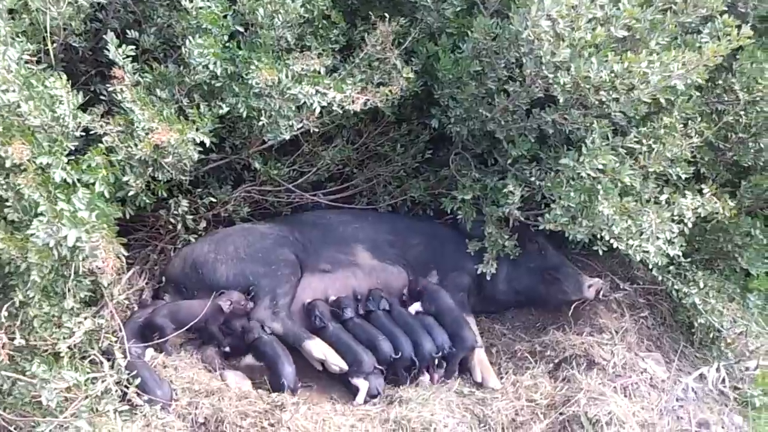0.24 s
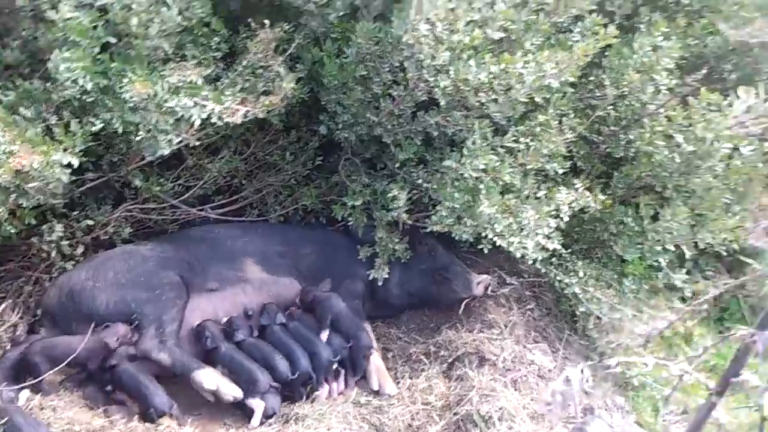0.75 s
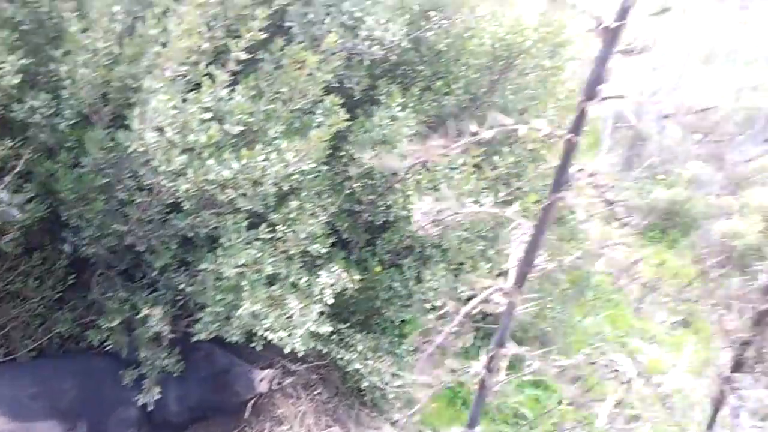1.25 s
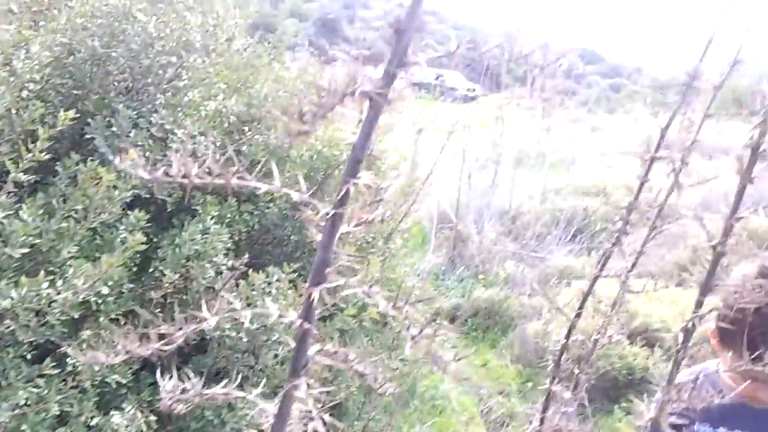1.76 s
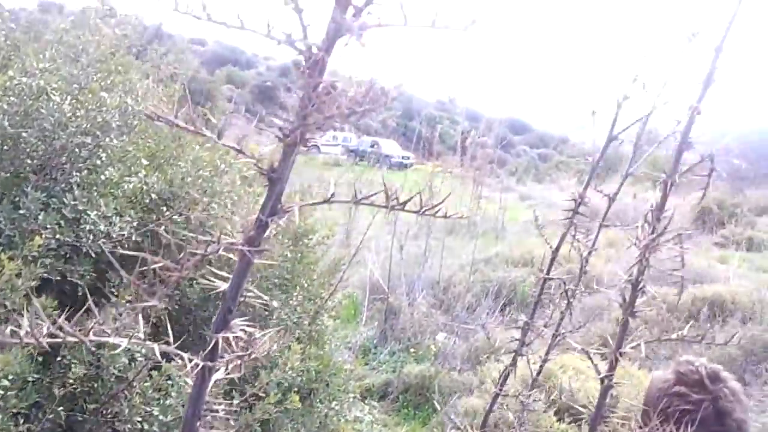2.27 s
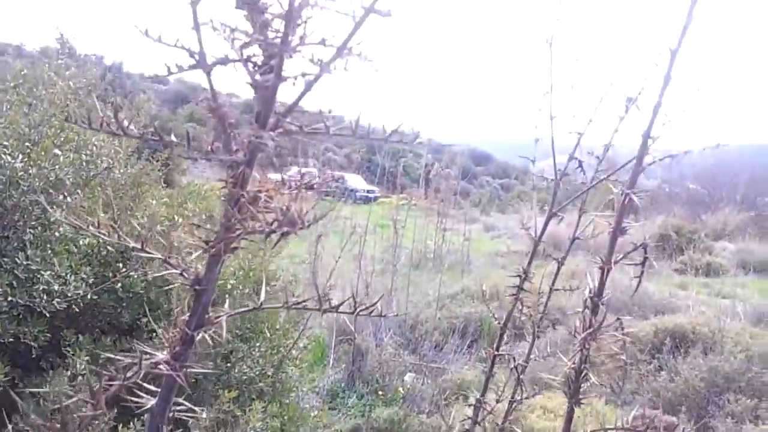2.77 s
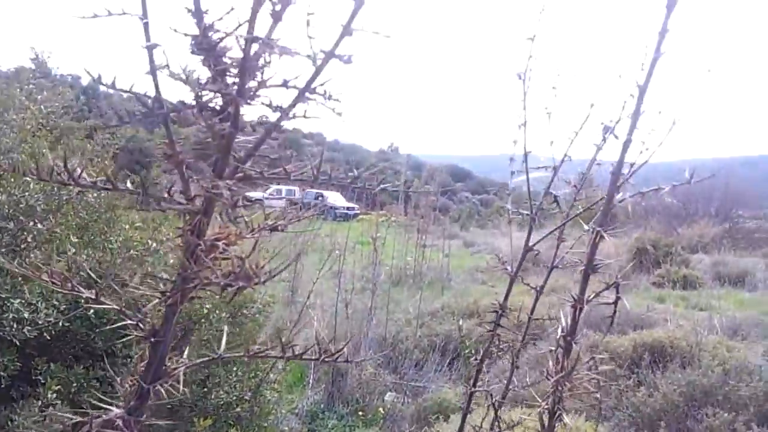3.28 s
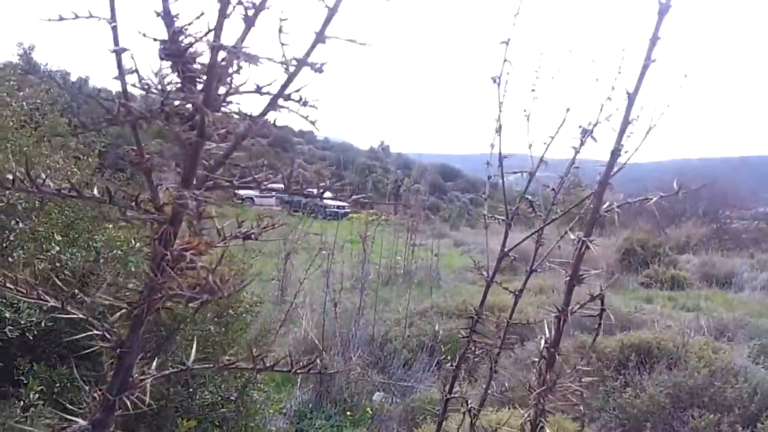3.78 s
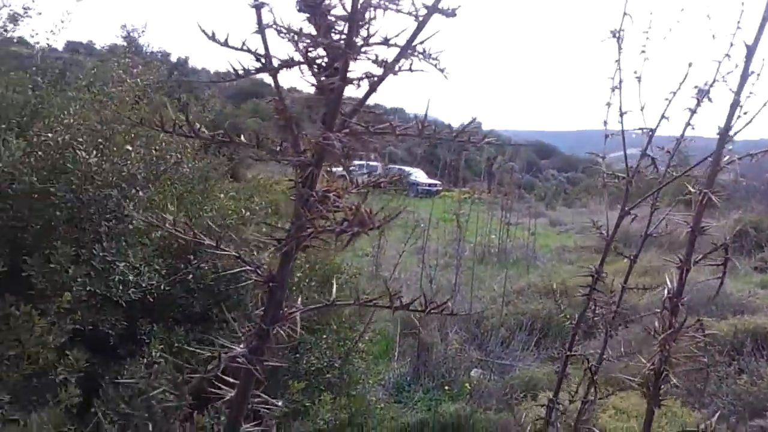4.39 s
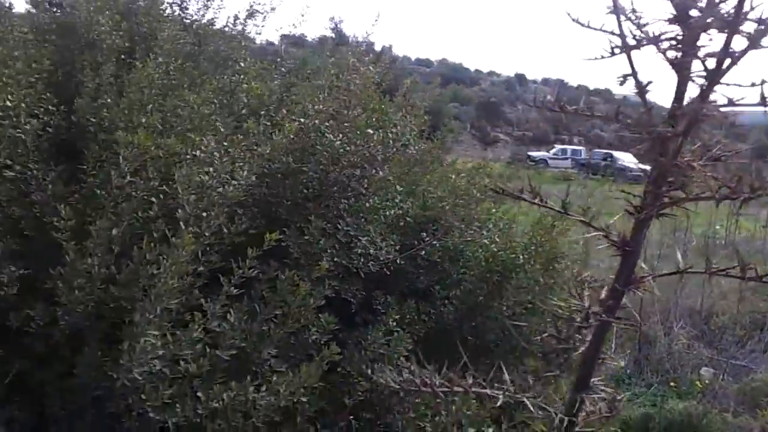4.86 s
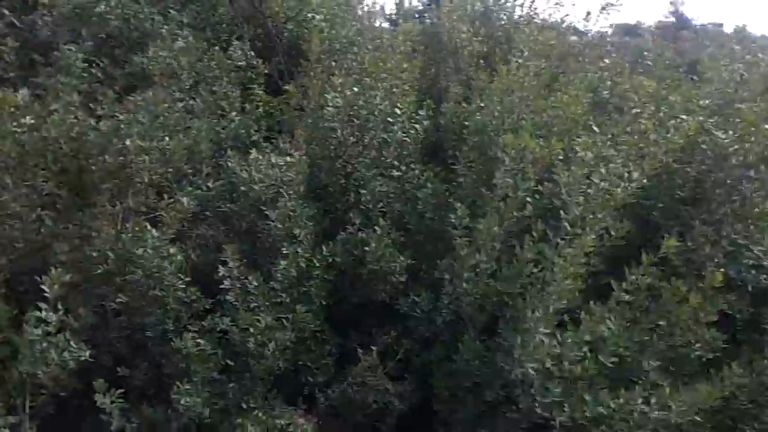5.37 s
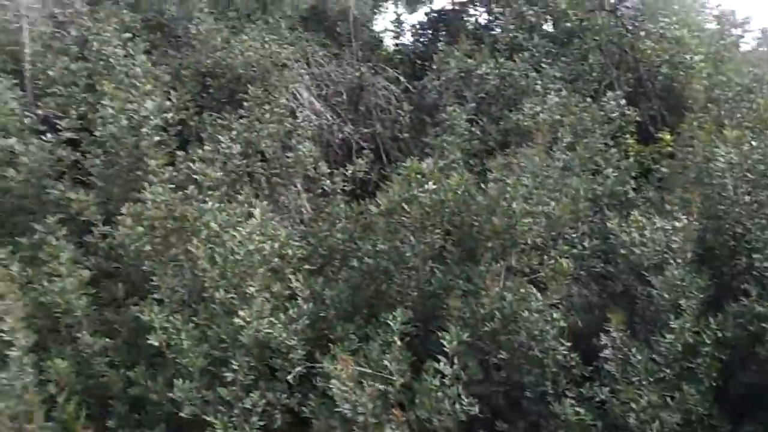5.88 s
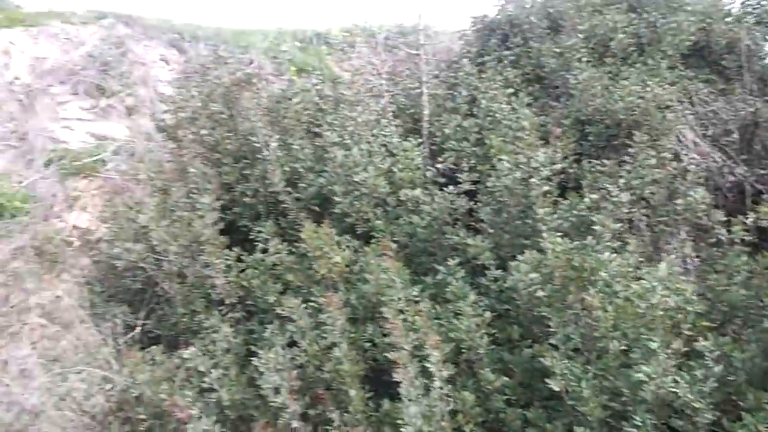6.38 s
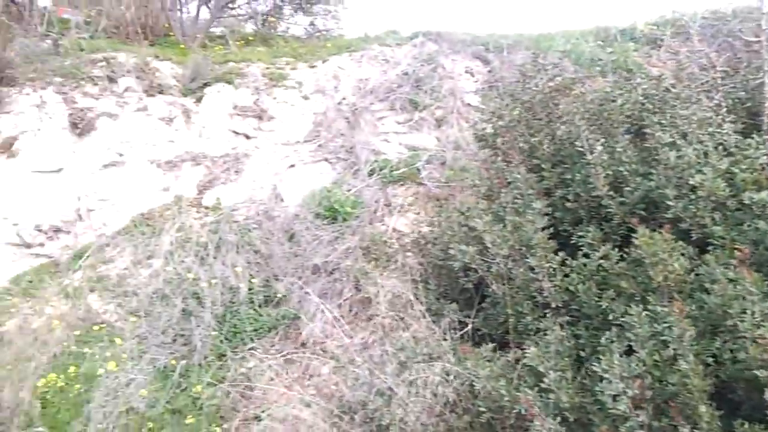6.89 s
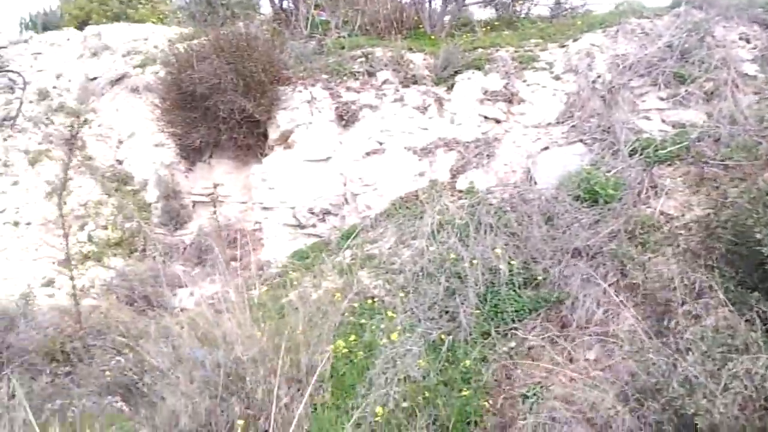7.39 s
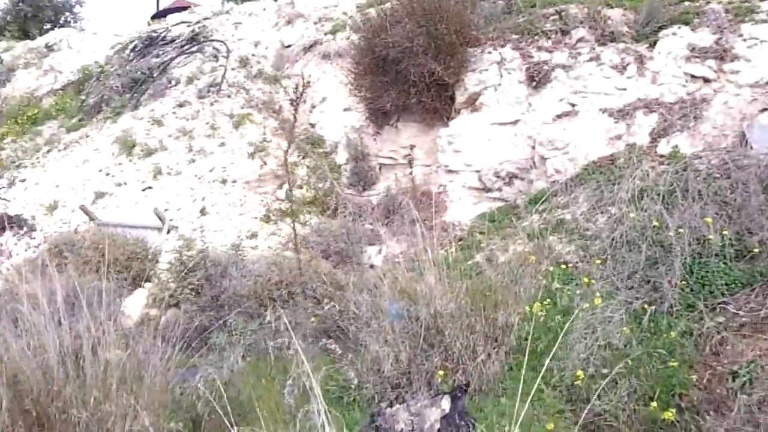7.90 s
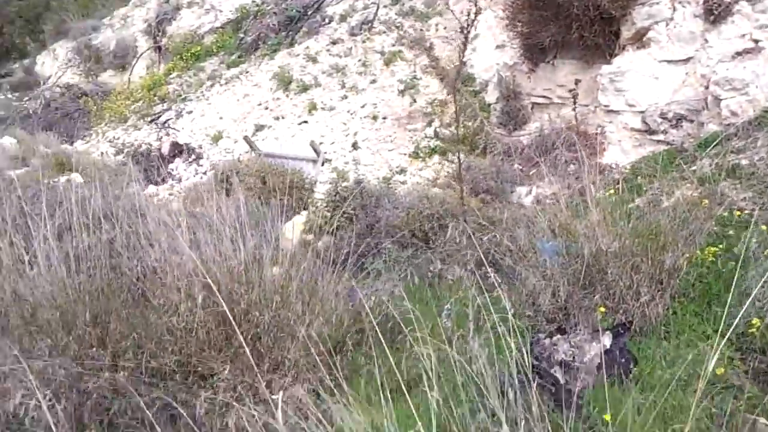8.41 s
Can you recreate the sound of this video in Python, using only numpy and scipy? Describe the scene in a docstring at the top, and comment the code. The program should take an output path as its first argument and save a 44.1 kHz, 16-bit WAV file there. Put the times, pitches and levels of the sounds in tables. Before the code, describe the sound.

Outdoors on a dry, scrubby slope, quiet air hiss and low wind rumble run throughout. A nearby pig grunts in slow trains of two or three throaty pulses, sometimes longer, with nasal snout air. Faint brief piglet squeaks and high whines answer; a little bird twitters from about two seconds on. Small crisp stalk snaps and wind puffs hit the phone microphone, with almost no echo.

```python
"""Outdoor air and a rumbling breeze last throughout, coloured noise heard on a dry hillside by a phone's two ports.
From the start a sow under a bush grunts to her suckling piglets: slow trains of flaps ring her throat and snout.
Piglets squeak faintly as gliding tones, grainy hiss swells mostly around the grunts, dry stalks tick from 0.1 s.
From 0.4 s wind puffs bump the ports, mostly the left, as brief pressure dips.
High chips and thin whines begin at 0.9 s; from 1.6 s a small bird repeats one frequency-modulated twitter."""
import sys
import numpy as np
from scipy import signal
from scipy.fft import rfft, irfft
from scipy.io import wavfile

SR = 44100
rng = np.random.default_rng(int(sys.argv[2]) if len(sys.argv) > 2 else 0)


def master(y):
    """Save y as 16-bit WAV."""
    cut = np.clip(np.atleast_2d(y).T, -1, 1)
    pcm = np.round(cut * 32767)  # scale
    wavfile.write(sys.argv[1], SR, pcm.astype(np.int16))


N = 381465
SIZE = 4096  # samples in one short event
TIME = np.arange(N) / SR
SIDES = np.array([[1], [-1]])  # left, right


def undb(db):
    """Logarithmic level: decibels to amplitude gain."""
    return 10 ** (np.asarray(db) / 20)


def unit(x):
    """Normalisation of mean power: scale to rms 1."""
    return x / np.sqrt(np.mean(x ** 2))


def colour(points, hz):
    """Spectral envelope: read (frequency [Hz], level [dB]) points on a log-frequency axis."""
    point_hz, db = np.transpose(points)
    return np.interp(np.log(np.maximum(hz, 1)), np.log(point_hz), db)


def band(x, lo_hz, hi_hz, order=2):
    """Band limiting by a maximally flat (Butterworth) filter."""
    return signal.sosfilt(signal.butter(order, [lo_hz, hi_hz], "band", fs=SR, output="sos"), x)


def walk(rate, size):
    """Random modulation: straight lines between Gaussian values drawn at rate points per second."""
    return np.interp(np.arange(size) / SR * rate, np.arange(size), rng.standard_normal(size))


def swell(s, rise_s, fall_s):
    """Gaussian envelope of height 1 that peaks at time s, with separate rise and fall."""
    return np.exp(-((TIME - s) / np.where(TIME < s, rise_s, fall_s)) ** 2)


def add(out, s, x):
    """Superposition: mix x into out from time s."""
    i = int(s * SR)
    a, b = max(i, 0), min(i + x.shape[-1], N)
    if b > a:
        out[:, a:b] += x[..., a - i:b - i]


# spectrum of the open air: (frequency [Hz], relative spectral level [dB])
AIR_SPECTRUM = [(30, -4.5), (100, -8.5), (220, -6), (480, -4), (750, -5.5), (2100, -9), (4000, -9),
                (6100, -17.5), (8000, -17.5), (9100, -21.5), (10200, -17.5), (11500, -19), (13000, -14),
                (14500, -24)]
# balance of the air between the channels: (frequency [Hz], left minus right [dB])
AIR_BALANCE = [(60, 6), (200, 2), (700, -1.5), (2400, -3.5), (4400, 1), (7000, -3.5), (9800, 9.5),
               (12000, 2.5), (14500, -3)]


def air_noise():
    """Spectral shaping of Gaussian noise to the open air's colour, incoherent between the channels."""
    f = np.arange(N // 2 + 1) * SR / N
    shape = undb(colour(AIR_SPECTRUM, f) + SIDES * colour(AIR_BALANCE, f) / 2)
    return irfft(rfft(rng.standard_normal((2, N))) * shape, N)


def air(hiss_db=-66, top_db=-57.0, middle_db=-59.0, low_db=-61, flicker_db=2.5):
    """Broadband noise as a sum of bands: a flickering low wash, an even middle and fine treble hiss."""
    noise, steady = air_noise(), air_noise()
    hiss = undb(hiss_db) * unit(band(noise, 8700, 11000))
    treble = undb(top_db) * unit(band(steady, 6700, 17500, order=3))
    middle = undb(middle_db) * unit(band(noise, 924, 5400, order=4))
    low = undb(low_db + flicker_db * walk(36, N)) * unit(band(steady, 143, 996, order=3))
    return hiss + treble + middle + low


# wind puffs on the ports: (time [s], relative level [dB], dip frequency [Hz], left minus right [dB])
WIND_PUFFS = [(0.358, -44, 144, 34), (0.424, -27, 233, 42), (0.784, -49.5, 194, 32),
              (0.945, -39.5, 187, 23), (1.643, -48, 118, 27), (3.37, -44, 142.4, 25),
              (3.517, -38.5, 150, 33), (3.55, -31.5, 165, 22), (3.798, -45, 152, 32), (3.814, -44, 176, 28),
              (3.873, -46, 145, 17), (3.985, -47, 234, 20), (4.26, -42.5, 203, -41),
              (5.757, -49.5, 140, 33), (5.861, -49, 140, 30), (6.505, -42.5, 174, 28),
              (6.528, -30.5, 218, 40), (6.786, -47, 131, 24), (7.04, -43.5, 159, 32),
              (7.118, -48.5, 121.9, 26)]
# strength of the breeze on the ports: (time [s], relative rumble level [dB])
BREEZE_LEVELS = [(0.0, -70.5), (0.82, -76), (0.96, -66), (2.99, -75), (3.3, -61.5), (3.73, -65),
                 (3.95, -71.5), (4.84, -67), (5.25, -73), (5.98, -68.5), (6.19, -70.5), (7.28, -69.5),
                 (7.61, -72), (8.65, -70.5)]


def wind(gain_db=8, gust_db=2.5, wake_db=-60, wake_s=0.057):
    """Turbulent pressure noise: the breeze rumbles on the ports, more strongly around each puff."""
    breeze = undb(np.interp(TIME, *np.transpose(BREEZE_LEVELS)) + gain_db)
    wakes = sum(swell(s, wake_s, wake_s) for s, *_ in WIND_PUFFS)
    level = np.sqrt(breeze ** 2 + undb(wake_db) ** 2 * wakes)  # powers add
    return level * undb(gust_db * walk(12, N)) * unit(band(air_noise(), 47, 246))


def puffs(gain_db=7, eddy_db=-50, eddy_s=0.008):
    """Eddy impact on a port: a quick dip in pressure with a little churning around it."""
    out = np.zeros((2, N))
    t = (np.arange(SIZE) - SIZE // 2) / SR
    for s, db, hz, pan_db in WIND_PUFFS:
        dip = -np.cos(2 * np.pi * hz * t) / np.cosh(2.2 * hz * t)
        # stronger eddies hit with a harder knock, up to a limit
        dip = dip - min(undb(db + 25.5), .6) * np.exp(-(t / 0.00055) ** 2)
        churn = unit(band(rng.standard_normal(SIZE), 76, 222)) * np.exp(-abs(t) / eddy_s)
        balance = unit(undb(SIDES * pan_db / 2))
        add(out, s + t[0], balance * (undb(db + gain_db) * dip + undb(eddy_db) * churn))
    return out


def ticks(count=1500, spread_db=4, decay_s=0.00026):
    """Random impulses: short treble ticks, a few much louder than the rest."""
    impulses = np.zeros((2, N))
    for when, size, side in rng.random((count, 3)):
        impulses[int(side * 2), int(when * N)] += undb(-spread_db * np.log(max(1 - size, .03)))
    t = TIME[:SIZE // 8]
    tick = rng.standard_normal((2, len(t))) * np.exp(-t / decay_s)
    return unit(band(signal.fftconvolve(impulses, tick, axes=1)[:, :N], 8200, 18000))


# hiss swells: (time of the peak [s], nominal length [s], treble level [dB], middle re the treble [dB])
HISS_SWELLS = [(0.038, 0.34, -53, -4.5), (0.557, 0.34, -50, -3.5), (0.97, 0.33, -56, -0.5),
               (1.536, 0.22, -51.5, -3), (2.14, 0.15, -56, -1.5), (2.338, 0.1, -54.5, -7),
               (3.165, 0.81, -58, 0.5), (3.585, 0.19, -56, 0.5), (4.01, 0.15, -56.5, 0.5),
               (4.695, 0.52, -56, -1), (5.247, 0.19, -52.5, -4), (5.52, 0.2, -52.5, -7),
               (6.093, 0.54, -53.5, -2), (6.664, 0.41, -49.5, -5), (7.18, 0.41, -49, -4),
               (7.94, 0.59, -57, -1.5), (8.536, 0.16, -57.5, -1)]


def hiss_swells(rise=0.48, treble_grain=0.4, middle_grain=0.36, flutter_db=3.0, tick_db=-11):
    """Amplitude-modulated noise: grainy treble hiss near 10 kHz with a mid band, mostly around the grunts."""
    treble_power, middle_power = 0, 0
    for s, length, db, middle_db in HISS_SWELLS:
        hump = swell(s, rise * length, (1 - rise) * length)  # rise is a share of the length
        treble_power = treble_power + undb(db) ** 2 * hump
        middle_power = middle_power + undb(db + middle_db) ** 2 * hump
    noise = air_noise()
    treble = unit(band(noise, 8650, 12150) * np.exp(treble_grain * walk(1500, N)))
    treble = treble + undb(tick_db) * ticks()
    middle = unit(band(noise, 1080, 5870, order=4) * np.exp(middle_grain * walk(900, N)))
    flutter = undb(flutter_db * walk(25, N))
    return flutter * (np.sqrt(treble_power) * treble + np.sqrt(middle_power) * middle)


# dry stalks snapping: (time [s], relative crack level [dB], relative level of the body near 3 kHz [dB])
STALK_SNAPS = [(0.102, -31, -39), (0.1207, -34.5, -12), (0.198, -43.5, -20), (0.487, -47, -18),
               (4.0095, -41, -24), (5.5053, -29.5, -21), (6.435, -51, -2), (6.8321, -33, -0.5),
               (6.94, -43, -2), (7.0449, -34, -14), (7.122, -30.5, -17), (7.179, -38, -1.5),
               (8.002, -36.5, -9.5), (8.214, -48, -30)]


def twigs(decay_s=0.0016, gain_db=5, body_db=1):
    """Brittle fracture as decaying noise: dry stalks snap with a bright crack and a woody body."""
    out = np.zeros((2, N))
    t = TIME[:SIZE // 4]
    for s, db, wood_db in STALK_SNAPS:
        noise = rng.standard_normal((2, len(t)))
        crack = unit(band(noise, 8200, 21950))
        body = undb(wood_db + body_db) * unit(band(noise, 2400, 4100))
        add(out, s, undb(db + gain_db) * (crack + body) * np.exp(-t / decay_s))
    return out


def thicket(x, near_db, far_db, near_t60=0.039, far_t60=0.31):
    """Scattering and reverberation: branches return a short dense tail, the slope a faint longer one."""
    t = TIME[:SR // 2]
    out = x
    for db, t60 in (near_db, near_t60), (far_db, far_t60):
        decay = np.exp(-np.log(1000) * t / t60) * (t > .004)
        echo = rng.standard_normal((2, len(t))) * decay
        echo = band(echo, 180, 3500, order=1)  # long waves pass the twigs unscattered
        out = out + undb(db) * signal.fftconvolve(x, unit(echo) / np.sqrt(len(t)), axes=1)[:, :N]
    return out


# the bird's twitter: (time from its middle [s], frequency [Hz], relative level [dB])
TWITTER_SHAPE = [(-.066, 3000, -20), (-.054, 4000, -14), (-.046, 4420, -8), (-.030, 4280, -6),
                 (-.026, 4100, -22), (-.020, 3620, -7), (-.015, 3780, 0), (-.009, 3550, 0),
                 (-.003, 2950, -6), (0, 2850, -14), (.008, 3350, 0), (.016, 3950, -5), (.018, 3700, -12),
                 (.027, 3000, -1), (.038, 2800, -7), (.052, 2850, -20)]
# its repeats: (time of the middle [s], relative level [dB])
TWITTER_TIMES = [(1.619, -59), (2.567, -58), (3.348, -55), (4.102, -53.5), (5.169, -57), (5.885, -61),
                 (6.108, -54), (6.866, -57.5), (7.680, -58.5), (8.536, -52.5)]


def bird(gain_db=2):
    """Frequency modulation: a thin, wavering zigzag whistle, never quite the same twice."""
    out = np.zeros((2, N))
    s, hz, db = np.transpose(TWITTER_SHAPE)
    t = np.arange(s[0], s[-1], 1 / SR)
    for at, level_db in TWITTER_TIMES:
        track = np.interp(t, s, hz) * (1 + .008 * walk(400, len(t)) + .008 * walk(60, len(t)))
        loud_db = level_db + gain_db + np.interp(t, s, db) + 2 * walk(170, len(t))
        add(out, at + s[0], undb(loud_db) * np.sin(2 * np.pi * np.cumsum(track) / SR))
    return out


# both: (time [s], length [s], nominal start [Hz], nominal end [Hz], relative level [dB], roughness [1])
PIGLET_SQUEAKS = [(0.04, 0.079, 299, 420, -61, 1), (0.223, 0.011, 1360, 1260, -69, 0),
                  (0.89, 0.025, 1530, 1460, -59.5, 0.13), (1.962, 0.039, 540, 484, -60, 0.88),
                  (2.004, 0.0099, 1110, 1520, -55, 0.3), (2.293, 0.091, 385, 346, -60.5, 0.58),
                  (2.745, 0.08, 1680, 1030, -66, 0.16), (3.355, 0.029, 1394, 1896, -50, 0),
                  (3.388, 0.12, 1477, 1750, -60.5, 0.5), (3.43, 0.15, 800, 707, -59, 0.36),
                  (3.45, 0.061, 1556, 1430, -61, 0.34), (4.272, 0.018, 804, 1080, -54, 0.07),
                  (5.66, 0.024, 1167, 915, -59, 1.55), (5.927, 0.071, 1426, 1100, -56, 0.4),
                  (5.946, 0.21, 1590, 1837, -63, 0.47), (6.565, 0.026, 620, 560, -62, 1.46),
                  (7.315, 0.028, 1453, 1015, -47.5, 0.58), (7.558, 0.042, 1380, 1094, -60, 1.26),
                  (8.252, 0.056, 550, 573, -60, 0.9)]
HIGH_CHIPS = [(0.885, 0.027, 3100, 2920, -57, 0.2), (0.93, 0.016, 3620, 3560, -51, 0.2),
              (1.025, 0.0065, 3460, 3580, -42.5, 0.2), (1.489, 0.0085, 2790, 3600, -37, 0.1),
              (1.502, 0.0082, 3950, 3750, -45, 0.1), (3.363, 0.032, 3630, 2730, -58, 0.1),
              (3.39, 0.075, 2846, 3550, -61, 0.15), (3.43, 0.04, 3500, 3470, -57, 0),
              (3.585, 0.085, 3420, 3500, -53, 0.33), (3.59, 0.082, 3800, 3800, -52, 0.3),
              (4.318, 0.02, 3400, 4500, -56, 0.1), (4.728, 0.092, 3700, 3620, -57, 0.08),
              (4.772, 0.013, 3800, 4200, -45, 0.07), (6.35, 0.016, 3600, 4600, -49, 0.04),
              (6.325, 0.075, 3960, 3100, -57.5, 0.3), (6.77, 0.095, 3620, 3620, -57, 0.19),
              (7.205, 0.04, 3750, 3370, -58, 0.12), (7.243, 0.045, 3450, 3850, -51, 0)]  # high chips and thin whines


def glides(calls, gain_db, second_db, wobble=0.194, wobble_rate=700):
    """Gliding two-harmonic tones: the hoarse ones waver quickly in pitch and strength."""
    out = np.zeros((2, N))
    for s, length, start_hz, end_hz, db, rough in calls:
        n = int(length * SR)
        hz = np.linspace(start_hz, end_hz, n) * (1 + wobble * rough * walk(wobble_rate, n))
        phase = 2 * np.pi * np.cumsum(hz) / SR
        voice = np.sin(phase) + undb(second_db) * np.sin(2 * phase)
        voice = voice * (1 + rough * walk(wobble_rate, n))
        add(out, s, undb(db + gain_db) * unit(voice) * signal.windows.tukey(n, .7))
    return out


def ringing(gain):
    """Minimum phase by a folded cepstrum: a response with these gains that starts at once and dies away."""
    cepstrum = irfft(np.log(gain + 1e-6))
    cepstrum[1:SIZE // 2] *= 2
    cepstrum[SIZE // 2 + 1:] = 0
    return np.exp(rfft(cepstrum))


def burst(decay_s, early_s):
    """Turbulence spectrum: a decaying noise puff of unit energy, starting early_s before the closure."""
    noise = unit(rng.standard_normal(SIZE) * np.exp(-TIME[:SIZE] / decay_s))
    return rfft(np.roll(noise, -int(early_s * SR))) / np.sqrt(SIZE)


# throat and snout resonances: (nominal frequency [Hz], nominal width [Hz], relative level [dB])
RESONANCES = [(216, 42, -1), (273.6, 77, 3), (464, 90, -8), (572, 112, -2.5), (910, 70, -15), (1058, 79, 5),
              (1500, 97, 0.5), (1705, 172, 0.5), (2196, 186, -1.5), (2380, 240, -11), (2686, 230, -2),
              (3234, 150, 5.5), (3570, 200, 1), (4230, 130, -6.5)]
# where a flap's colour acts [Hz]: chest, throat, snout from-to, mouth from-to, nose, snap from-to, top
COLOUR_HZ = [300, 575, 850, 1100, 1400, 1800, 2160, 2500, 2700, 3300]
# moving throat and snout: (time [s], snout resonance [Hz], ratio for resonances below 700 Hz [1])
SNOUT_SHAPE = [(.5, 1035, 0.92), (.95, 1010, 1.08), (1.03, 1100, 0.89), (1.37, 1040, 0.87),
               (1.45, 900, 0.97), (1.53, 1090, 0.98), (2.106, 937, 0.99), (2.19, 1050, 1.03),
               (3.04, 1034, 0.95), (3.25, 1030, 0.91), (3.59, 1018, 0.97), (3.95, 935, 1.09),
               (4.46, 930, 0.93), (4.53, 953, 0.95), (4.61, 1074, 0.98), (4.88, 1090, 0.94),
               (5.48, 957, 0.97), (5.93, 1046, 0.94), (6.04, 1106, 0.86), (6.24, 1130, 0.79),
               (7.2, 1034, 0.88), (7.39, 1075, 0.9), (8.46, 1013, 1.01), (8.6, 1075, 1.08)]
# how closely a resonance follows the snout: (frequency [Hz], exponent [1])
SNOUT_FOLLOW = [(600, 0), (850, 1), (1100, 1), (1700, 0.7), (2160, 0.1), (2700, 0.4), (3400, 0.3)]
# colour of the two channels: (frequency [Hz], left minus right [dB])
CHANNEL_BALANCE = [(250, 4.5), (560, 2.5), (1030, -2), (2400, -1), (4200, -1)]
# bearing of the sow as the phone turns: (time [s], nominal lead of the right channel [ms])
SOW_BEARING = [(0, .2), (.5, -.1), (1, -.03), (1.5, .16), (2.1, .24), (3.1, .29), (4.6, .19), (5.4, -.1),
               (6, -.32), (7.2, -.34), (8.5, -.26)]


def flap(at_s, db, loose, parts_db, opening=0.22, gain_db=46, rasp_db=-14, rasp_s=0.0033,
         creak_s=.007, steepness=1.45):
    """Source and filter: a fold's soft opening push, sharp closure and rasp of air ring the throat."""
    f = np.arange(SIZE // 2 + 1) * SR / SIZE
    hz, width, mode_db = np.transpose(RESONANCES)[:, :, None]
    chance = rng.standard_normal((len(hz), 2))
    throat, snout, mouth, nose, snap, top = parts_db
    parts = [0, throat, snout, snout, mouth, mouth, nose, snap, snap, top]
    mode_db = mode_db + np.interp(hz, COLOUR_HZ, parts) + chance[:, :1]
    # the snout carries the middle resonances with it; the lowest move with the throat
    shape_s, *shapes = np.transpose(SNOUT_SHAPE)
    snout_hz, throat_ratio = (np.interp(at_s, shape_s, column) for column in shapes)
    snout_ratio = (snout_hz / 1060) ** np.interp(hz, *np.transpose(SNOUT_FOLLOW))
    hz = hz * np.where(hz < 700, throat_ratio, snout_ratio) * (1 + .015 * chance[:, 1:])
    # narrow resonances ring on after the closure and leave dark valleys between them
    resonance = abs(f * width / (hz ** 2 - f ** 2 + 1j * f * width)) ** steepness
    ring = ringing(np.linalg.norm(undb(mode_db) * resonance, axis=0))
    # slack folds, those with a weak snap, open audibly 3.6 ms before they close
    slack = np.clip(-(snap + 6) / 15, 0, 1.3)
    push = opening * slack * np.exp(-(f / 1500) ** 2 + 2j * np.pi * f * .0036)
    rasp = undb(rasp_db) * burst(rasp_s, 0) * np.minimum(f / 1000, 2)
    closure = (1 + push + rasp) / (1 + abs(push) / 2)
    # loose folds flutter raggedly instead of closing at once
    loose = np.clip(loose, 0, 1)
    drive = np.sqrt(1 - loose ** 2) * closure + loose * burst(creak_s, creak_s * .7)
    sound = ring * drive * undb(SIDES * colour(CHANNEL_BALANCE, f) / 2)
    # the two channels carry near-opposite polarity, one slightly ahead, less so for the lows
    lead_ms = np.interp(at_s, *np.transpose(SOW_BEARING))
    lead_phase = 2 * np.pi * f * lead_ms * 1e-3 * np.interp(f, [500, 1050], [.4, 1])
    sound[1] *= -np.exp(1j * (lead_phase + np.clip(2 * lead_ms, .1, .35)))
    wave = np.roll(irfft(sound), SIZE // 4, axis=1)
    return undb(db + gain_db) * wave * signal.windows.tukey(SIZE, .5)


# a flap colour is six levels re the chest [dB]: throat (575 Hz), snout (1 kHz), mouth (1.6 kHz),
#   nose (2.2 kHz), snap (2.6 kHz), top (3.4 kHz)
# grunts: (time of first full flap [s], initial rate [flaps/s], relative level [dB], swell to second flap [dB],
#   fade to last flap [dB], later flaps' throat, snout, middle and top re the settled colour [dB; the mouth
#   takes half the middle], lead-in's advance [s], its level re the first flap [dB], first flap's colour [6 x dB])
SOW_GRUNTS = [(0.035, 24.74, -39.5, -3.5, -6, 5, 1, -6, -10, 0.017, -10, -2, -10.5, -12, -4, -6.5, -12),
              (0.511, 29.8, -37.5, 4.5, 0, -4, -3, 2, 5, 0.024, -17, -4, -2, -2, -12, -4.5, -6),
              (0.9535, 26.97, -33, 3.5, -4.5, -6, -5, 1, -7, 0.031, -1, -5, -8, -13, -28, -25, -27),
              (1.4523, 26.2, -28, 1.5, -9.5, 0, -0.5, -2, -4, 0.038, -7.5, -3, -8.5, -27, -40, -22, -40),
              (2.1063, 26.76, -33.5, 5, 0, 3.5, 0.5, -1, 7, 0.032, -14.5, 8.5, 1.5, -9.5, -34, -2, -25),
              (2.8841, 24.15, -34.5, -9.5, 0, -9, -7, 20.5, 8, 0.035, -13, 1, -11.5, -12, -12, -14, -28),
              (3.0391, 25.17, -42.5, 6.5, 0, 6, 1, -8, -12, 0.016, -12, 11.5, -0.5, -0.5, -1, 1, -20),
              (3.212, 27.26, -34, 2, 0, 3, 3.5, 8, -2, 0.032, -7.5, 2.5, -4.5, -10.5, -11, -12, -31),
              (3.3801, 23.7, -35.5, 0, 0, 7, -3, -14, -8, 0.023, -13, 10.5, -5, -7, -0.5, -5, -24),
              (3.5485, 26.35, -26, -2, 0, 2.5, 4.5, 10, 5, 0.032, -20.5, -4, -6, -9, -7, -2.5, -17),
              (4.4994, 30.15, -30.5, -2, 0, 2, -5, -6, 5, 0.038, -6, -3, -10.5, -39, -15.5, -24, -33),
              (4.5684, 26.55, -32, -0.5, -5.5, 2, -1, 1.5, 3, 0.017, -6, -2.5, -10, -14.5, -15, -15.5, -22),
              (5.4765, 25.3, -29, -10, 0, -16, -15, 9, 18.5, 0.034, -7, -5, -7.5, -21, -15, -13, -26),
              (5.963, 26.47, -31.5, -1, -9, 1.5, -2.5, 6, 4.5, 0.032, -3.5, -5, -8.5, -14, -32, -26, -29),
              (7.2005, 26.3, -38.5, 5.5, -9.5, 2.5, -3, 9.5, 1, 0.024, -10.5, 5, -4, 1, -1, -4, -13),
              (7.7133, 24.1, -46, 5, -7.5, 5.5, 1, 1, -8, 0.038, -28, 7, -15, -12, -2.5, -12, -24),
              (8.4566, 26.05, -36.5, 3, -11.5, 3, -4, 7.5, 2.5, 0.03, -9, 0, -5, -4, -27, -4.5, -23)]
# full flaps in each grunt: (count)
GRUNT_FLAPS = [3, 2, 3, 3, 2, 2, 2, 2, 2, 2, 2, 9, 2, 8, 6, 2, 5]
# single throat flaps, some alone and some close beside a grunt or in pairs:
#   (time [s], relative level [dB], looseness 0-1 [1], colour [6 x dB])
SINGLE_FLAPS = [(0.481, -47, 0.1, -1, 3, 2, -3, -6, -18), (0.492, -45, 0.1, -1, -4, -2, -6, -5, -12),
                (1.3692, -45, 0.1, 6, -2, -13, -15, -12, -27),
                (2.1893, -45.5, 0.31, -3, -22, -14, -10, -22, -22),
                (2.8267, -54, 0.1, 1, -5, -6, 7, 10.5, -12), (3.019, -43, 0.05, 7, 1, -1, 4, 13.5, -3),
                (3.1092, -41, 0.1, 3, -9, -11, 0.5, -7, -9), (3.868, -45, 0.81, 3, -23, -29, -26, -24, -20),
                (3.924, -34, 0.99, -1.5, -21, -36, -16, -32, -34),
                (3.9531, -31, 0.12, 2, -7, -39, -11, -17, -31),
                (4.006, -53.5, 0.26, -4, 4.5, -5, -16, -14, -21),
                (4.4817, -35.5, 0.3, -14, -17, -34, -23, -31, -35),
                (5.462, -34.5, 0.37, -4, -8, -26, -27, -22, -25),
                (6.608, -52, 0.6, 7, -1, 0.5, -8, -12, -18)]
# colour that every grunt settles into, before its own offsets: six levels re the chest [dB]
SETTLED_COLOUR = [1.5, -9.5, -17.5, -32, -26, -25]


def snout_air(gain_db=-55, linger_s=0.026, body_db=-6):
    """Turbulent flow noise: air rushes through the sow's snout, swelling and fading with each grunt."""
    power = 0
    for count, (s, rate, *_) in zip(GRUNT_FLAPS, SOW_GRUNTS):
        half = (count - 1) / rate / 2
        power = power + swell(s + half, half + linger_s / 2, half + linger_s)
    noise = air_noise()
    rush = unit(band(noise, 730, 4540, order=4))
    body = undb(body_db) * unit(band(noise, 135, 910, order=3))
    return undb(gain_db) * np.sqrt(power) * (rush + body)


def sow(slowing_s=0.00031, build_s=.0003, lead_loose=0.88, lead_throat_db=-2, loose=0.37,
        hard_loose=0.065, arch_db=3):
    """Pulse-train phonation: an opening flap of its own colour, then a slowing rattle as the air runs out."""
    flaps = [(s, db, slack, parts_db) for s, db, slack, *parts_db in SINGLE_FLAPS]
    for count, grunt in zip(GRUNT_FLAPS, SOW_GRUNTS):
        s, rate, db, swell_db, fade_db, warm_db, ring_db, bright_db, top_db, lead_s, lead_db, *onset_db = grunt
        lead_colour = [onset_db[0] + lead_throat_db, *onset_db[1:]]
        flaps.append((s - lead_s, db + lead_db, lead_loose, lead_colour))
        # a bright grunt opens with one clean, hard closure
        hard = np.interp(max(onset_db[2:]), [-16, -8], [0, 1])
        flaps.append((s, db, loose + hard * (hard_loose - loose), onset_db))
        offsets_db = [warm_db, ring_db, bright_db / 2, bright_db, bright_db, top_db]
        settled_db = np.add(SETTLED_COLOUR, offsets_db)
        for k in range(1, count):
            spent = (k - 1) / max(count - 2, 1)
            # the push is hardest in mid-grunt, and brightens the upper resonances
            push_db = arch_db * np.sin(np.pi * spent) * np.linspace(0, 1, len(SETTLED_COLOUR))
            at_s = s + k / rate + slowing_s * k * (k - 1) / 2  # each gap is slowing_s longer
            flaps.append((at_s, db + swell_db + fade_db * spent ** 2, loose, settled_db + push_db))
    out = np.zeros((2, N))
    for s, *voice in flaps:
        add(out, s - build_s - SIZE // 4 / SR, flap(s, *voice))
    return out


def scene():
    """Superposition of sources: animals in the thicket, with wind and stalks close to the phone."""
    background = air() + wind() + puffs() + hiss_swells() + twigs()
    chips = glides(HIGH_CHIPS, gain_db=-4, second_db=-19, wobble=0.21, wobble_rate=810)
    high_calls = thicket(bird() + chips, near_db=-9.5, far_db=-15)
    squeaks = glides(PIGLET_SQUEAKS, gain_db=2.0, second_db=-13.5)
    piglets = thicket(squeaks, near_db=-3.0, far_db=-22.0)
    grunts = thicket(sow(), near_db=-19.5, far_db=-23.5) + snout_air()
    return background + high_calls + piglets + grunts


def record(dry):
    """Band limiting by the phone: it thins the deep bass and cuts the top."""
    thinned = signal.sosfilt(signal.butter(2, 54, "high", fs=SR, output="sos"), dry)
    return signal.sosfilt(signal.ellip(10, .2, 70, 14700, fs=SR, output="sos"), thinned)


dry = scene()
out = record(dry)
master(out)
```